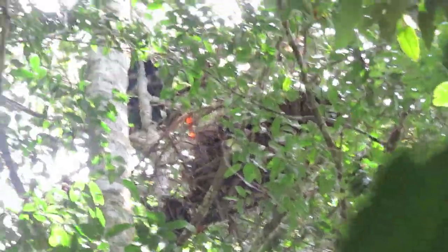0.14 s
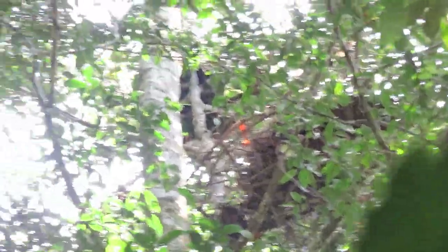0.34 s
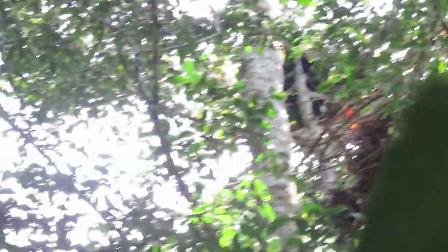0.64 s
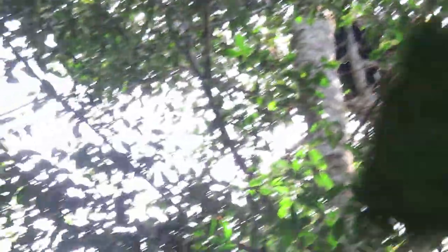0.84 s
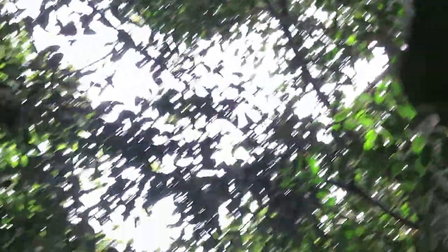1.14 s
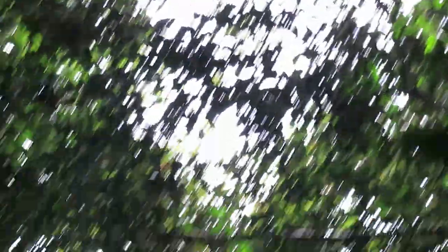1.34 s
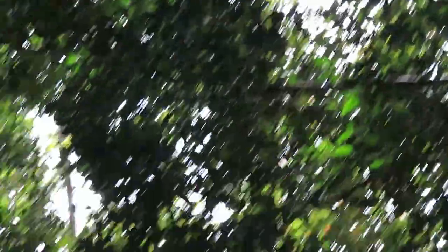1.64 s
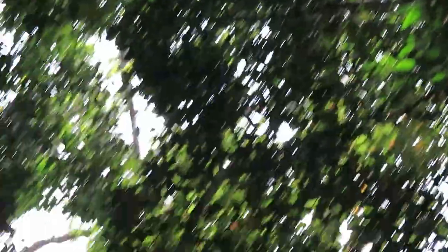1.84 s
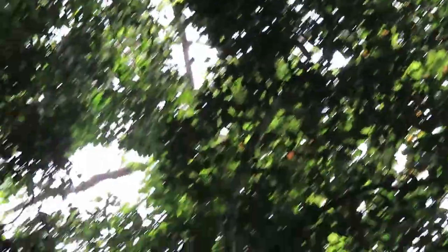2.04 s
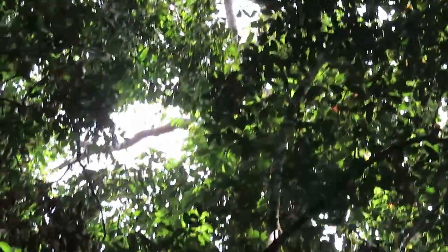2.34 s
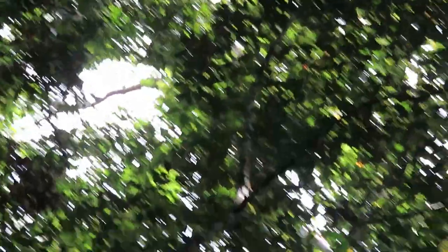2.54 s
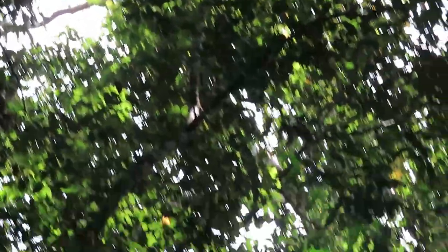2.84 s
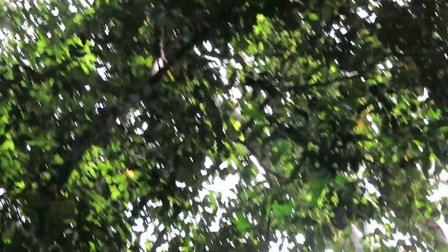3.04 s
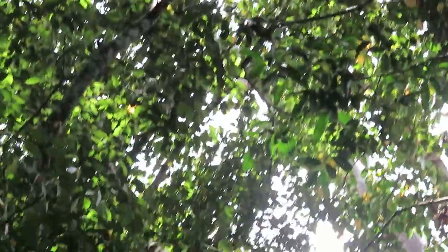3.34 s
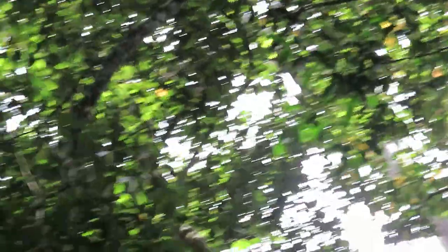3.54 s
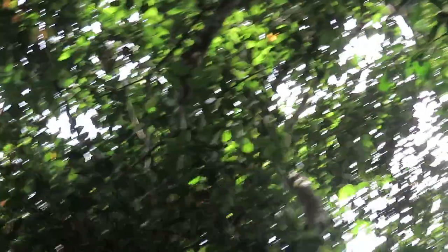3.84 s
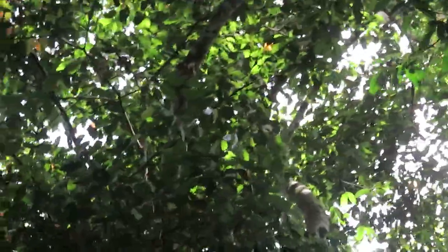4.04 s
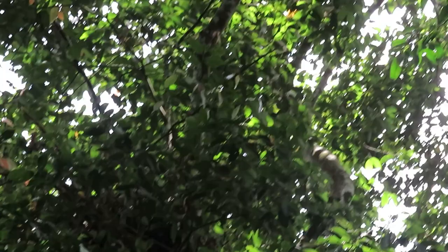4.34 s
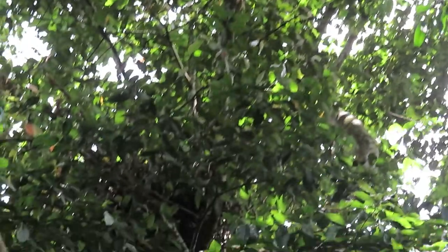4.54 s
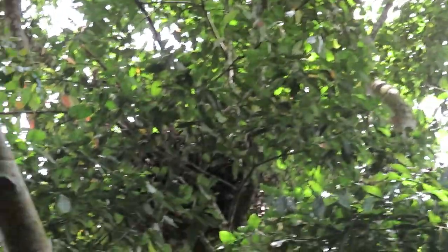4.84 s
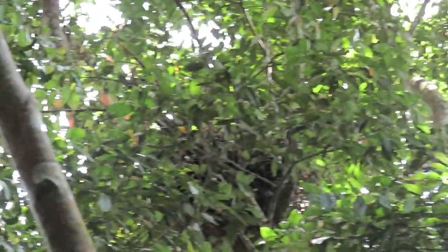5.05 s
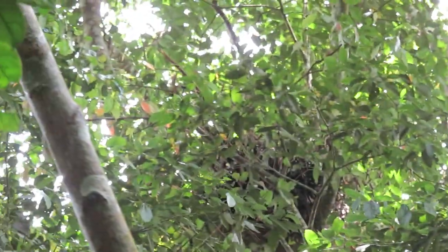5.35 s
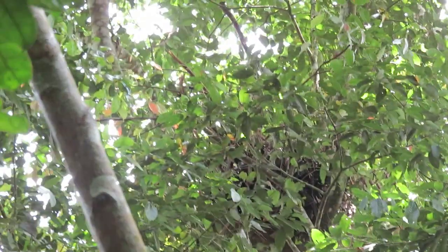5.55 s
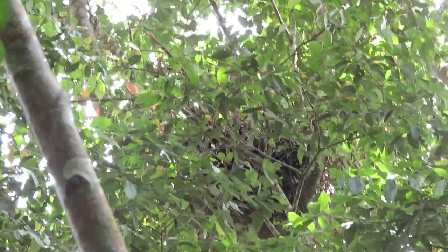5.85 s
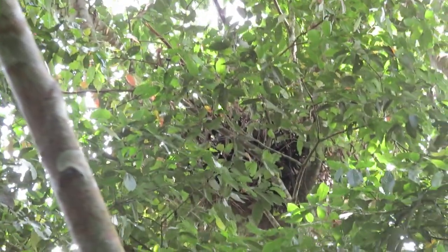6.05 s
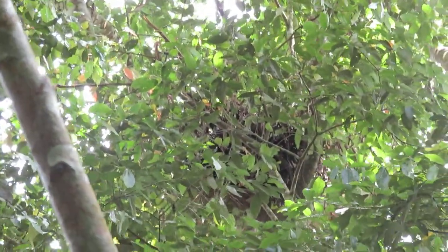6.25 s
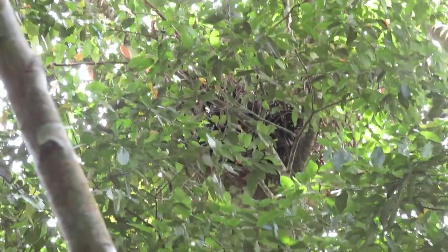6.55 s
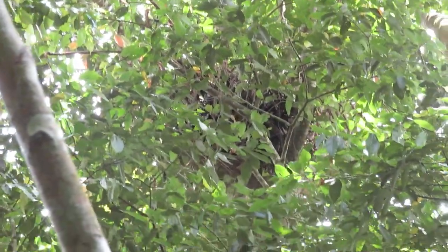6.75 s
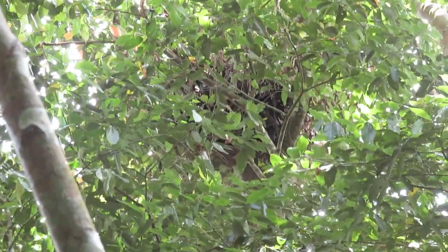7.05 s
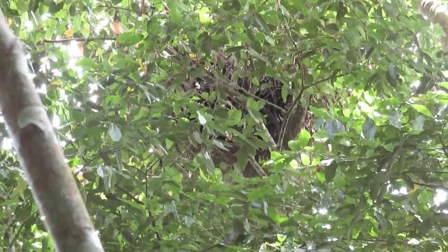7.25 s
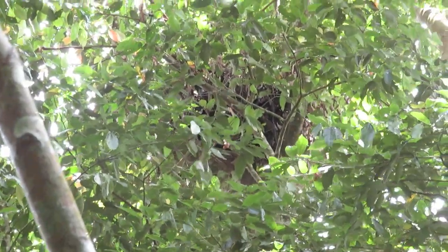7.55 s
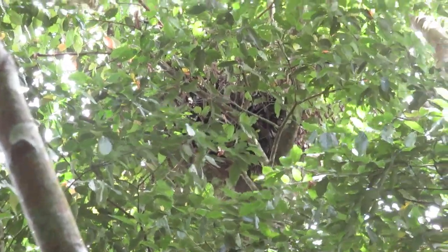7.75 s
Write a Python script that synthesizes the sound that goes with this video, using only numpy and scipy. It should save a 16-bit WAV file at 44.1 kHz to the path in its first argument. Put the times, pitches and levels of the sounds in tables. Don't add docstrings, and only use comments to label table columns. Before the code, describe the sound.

A soft, steady forest hush with very faint high insect singing runs throughout, heard from a handheld stereo camera. A dull knock lands at 0.1 s; from about 0.3 to 2.1 s nearby strained wood trembles in rapid, dry stick-slip creaks over low rubbing. Fibres snap sharply at 1.5 s and more lightly at 2 s, while a distant bird whistles upward near 1.8 s. Small wind puffs and dull housing thuds follow around 2.1 s, higher knocks at 2.7-3 s and another faint whistle at 3.1 s. The loudest crack, a tight cluster, bursts at 3.8 s. Birdcall returns at 4.6 s. From 5 to 6.2 s the rubbing swells into short hums with tiny ticks. A bright snap hits at 6.3 s, a faint whistle at 6.4 s, then creaks stutter from 6.5 to 7.4 s, with a snap near 7.25 s. From 7.7 s, low gusts bump the microphone, left first.

```python
import sys
import numpy as np
from scipy import signal
from scipy.io import wavfile
from scipy.ndimage import uniform_filter1d

SR = 44100
rng = np.random.default_rng(int(sys.argv[2]) if len(sys.argv) > 2 else 0)


def to_wav(sig):
    pcm = np.clip(np.atleast_2d(sig), -1, 1) * 32767
    pcm = np.round(pcm).astype(np.int16)
    wavfile.write(sys.argv[1], SR, pcm.T)


def attenuation_scalar(level_db):
    decades = np.asarray(level_db, float) / 20
    return 10 ** decades


N = 347949

# freq_hz, density_db_per_hz
HUSH_SPECTRUM = [(12, 7.5), (25, 6.5), (50, -2.5), (150, -6), (500, -2.5), (1200, -6.5), (1400, -9.5),
                 (3000, -20), (5500, -25.5), (6450, -19), (8200, -17), (10300, -26), (14000, -25.5),
                 (16500, -24)]
# freq_hz, correlation
HUSH_LIKENESS = [(60, 0.196), (180, 0.152), (550, 0.168), (1650, 0.11), (4970, 0.12), (15000, -0.042)]
# freq_hz, level_db
INSECT_BANDS = [(6460, -99), (6632, -77), (6998, -90.5), (7138, -77.5), (7671, -77.5), (8269, -101.5)]
# start_s, length_s, from_hz, to_hz, level_db
BIRD_GLIDES = [(0, .03, 4834, 4900, -73), (0, 0.034, 5360, 5600, -75), (1.8, 0.108, 4208, 4750, -73),
               (1.889, 0.094, 4713, 5520, -73), (3.031, 0.12, 4206, 4850, -74),
               (3.134, .07, 4820, 5580, -73), (4.628, 0.039, 4390, 5120, -71),
               (4.658, 0.091, 5072, 5310, -70), (4.738, .03, 5240, 3800, -72),
               (6.342, .045, 4080, 4050, -72), (6.379, 0.086, 4110, 4696, -72.5),
               (6.455, 0.088, 4706, 5550, -74.5)]
# peak_s, rise_s, fall_s, level_db, left_minus_right_db
WIND_PUFFS = [
    (1.975, .03, .04, -67, -6),
    (2.13, 0.068, .04, -62.5, -16),
    (2.236, 0.032, .015, -63, 6),
    (7.716, 0.021, 0.037, -52, 19),
    (7.755, 0.015, 0.021, -46, 0),
    (7.793, .015, .02, -45, 2),
    (7.825, .012, 0.017, -48, 4),
    (7.855, 0.015, 0.028, -46, 7),
]
# freq_hz, density_db_per_hz
WIND_SPECTRUM = [(8.8, -30), (15, -2), (32, 6), (86, -3.5), (230, -27), (400, -38), (650, -61.5),
                 (1100, -120)]
# start_s, peak_db, pitch_hz
HOUSING_KNOCKS = [
    (0.107, -35.5, 254),
    (2.061, -42, 260),
    (2.091, -39.5, 282.9),
    (2.119, -41, 281.5),
    (2.136, -40.5, 300),
    (2.677, -41.5, 477),
    (2.764, -42, 500),
    (2.96, -42, 489),
    (5.365, -46, 500),
    (5.45, -50.5, 330),
]
# time_s, pressure_db, low_lean_db
RUB_PRESSURE = [(0, -79, 13), (.35, -60, -4.5), (.9, -61.5, -14.5), (1.5, -57.5, 0.5), (1.75, -62, -10),
                (2.1, -64.5, 6), (2.3, -74, 3), (3.4, -79, -2), (3.7, -61, -7.5), (4.2, -71, 4),
                (4.95, -82, 8), (5.1, -64, -1.5), (6.15, -67, -3), (6.55, -60.5, -6), (6.74, -55, -5),
                (7.01, -57.5, -4), (7.36, -57, 4), (7.7, -72, 7.5)]
# peak_s, level_db, pitch_hz
DRAG_FLARES = [(1.3, -62, 570), (4.99, -64.5, 1155), (5.1, -69, 1120), (5.191, -60, 1140),
               (5.33, -63, 1134), (5.43, -60, 1165), (5.54, -60.5, 1154), (5.6, -57.5, 1140),
               (5.7, -63, 1150), (5.8, -61, 1140), (5.88, -56.5, 1165), (5.99, -62, 1137),
               (6.05, -69, 1150), (6.11, -63, 1150), (6.2, -58, 1155), (6.585, -59, 570), (6.635, -64, 580),
               (6.715, -52.5, 570), (6.76, -55.5, 570), (6.81, -52.5, 564), (6.845, -58, 560),
               (6.9, -58, 498), (7.43, -58, 549), (7.48, -58, 504), (.115, -63, 1490), (.125, -61, 450),
               (.165, -60, 480), (.215, -63, 470), (.24, -66, 600), (.54, -61, 834), (.61, -58, 1164),
               (.945, -58, 1200), (6.735, -56, 1260), (7.14, -60, 1350)]
# freq_hz, width_hz, level_db, right_lead_rad
BODY_LOW_MODES = [(384.5, 337, -18, 0.98), (570, 77, -19, -0.11), (833, 271, -3, 0.82)]
BODY_HIGH_MODES = [(1007, 81, -9, 0.15), (1220, 208, -3, 0.72), (1494, 390, -7.5, 0.715),
                   (1817, 243, -11.5, 0.74), (2867, 1900, -22, 2.1)]
# start_s, forward_db, back_db, slip_rate_hz
LOAD_TREMORS = [(.451, -49.5, -51, 435), (.522, -60, -66, 169.7), (.783, -54, -49, 294),
                (.854, -49, -46, 292), (.984, -47.5, -49.5, 290), (1.048, -53.5, -50.5, 270),
                (1.181, -54.5, -52, 322), (1.254, -50.5, -48, 286), (1.384, -49.5, -47.5, 276),
                (1.452, -55, -47.5, 272), (1.583, -51.5, -49, 290), (1.714, -52, -50.5, 263),
                (1.779, -60.5, -73, 252), (1.85, -66, -61, 310), (2.115, -58, -57, 308.6),
                (6.179, -62, -55.5, 311.7), (6.497, -71, -54.5, 253), (6.557, -52, -49, 295),
                  (6.62, -55.5, -50, 287), (6.692, -52, -47.5, 305.1), (6.754, -50, -54, 269),
                  (6.826, -56, -53, 289), (6.889, -49.5, -62.5, 270), (6.947, -50, -68, 210.5),
                  (7.024, -77, -65, 400), (7.087, -60, -47.5, 305.7), (7.157, -51, -45, 294),
                  (7.221, -44.5, -40, 304.6), (7.288, -45, -47.5, 364.4), (7.354, -61, -65.5, 349.3)]
# start_s, length_s,
# level_db, slip_rate_hz, low_minus_high_db
LONE_CREAKS = [(0.107, 0.0098, -55, 227.26, -8), (0.282, .0074, -57, 340, 2.5),
               (0.321, .0077, -49.5, 440, 2), (.583, 0.028, -54, 333, -1), (0.652, .0336, -49.5, 274, 1),
               (0.721, 0.0322, -47.5, 260, -1.5), (0.915, 0.0321, -52, 385, -1),
               (1.121, 0.026, -52.5, 304, -5.5), (1.321, 0.0238, -50.5, 270, -5),
               (1.658, 0.024, -46.5, 275, -2.5), (1.932, 0.0046, -52, 340, 3),
               (2.011, 0.0041, -50.5, 373, 1.5), (3.73, 0.00752, -55, 318, -1),
               (5.358, .0214, -57, 490, -7.5), (5.451, 0.0097, -55, 310, 1),
               (6.231, 0.0081, -44.5, 272.7, -6), (6.465, 0.015, -50.5, 275, -13),
               (6.792, 0.0315, -51.5, 270, -5), (7.066, .0064, -49.5, 269, -11),
               (7.131, .0166, -55, 290, -6.5), (7.425, 0.0886, -48.5, 270, -6)]
# start_s, peak_db, pitch_hz
SPLINTER_PINGS = [(1.5045, -41, 2950), (1.53, -38, 2950), (1.98, -37, 2950), (3.785, -36, 2900),
                  (3.7927, -33, 2950), (1.534, -40, 2750), (3.7955, -36, 2450), (6.2718, -33.5, 2950),
                  (6.278, -39, 2700), (6.5577, -54.5, 2300), (6.7234, -56, 2400), (6.9273, -48, 3200),
                  (6.9523, -54, 2500), (7.0725, -54, 2300), (7.09, -50, 2400), (7.1124, -51, 2400),
                  (7.1588, -47, 2800), (7.1865, -53, 3200), (7.2265, -49, 2700), (7.2453, -28, 2950),
                  (7.2955, -49, 2800), (7.3195, -53, 3100), (1.5308, -29, 1830), (3.791, -26, 1840),
                  (3.7945, -27, 1830), (3.7935, -41, 4000), (3.793, -43, 4900), (3.7932, -42, 5630),
                  (5.229, -52, 3300), (6.2775, -42, 5650), (6.2785, -44, 3790), (6.278, -49, 8300),
                  (6.2745, -31, 1210), (7.2458, -33, 2300), (7.246, -43, 4000), (6.929, -46, 2100)]
# freq_hz, left_db, right_db, t60_s, right_lead_rad
WOOD_MODES = [(640, -25, -26.5, 0.025, -0.5), (843, -31.5, -30, 0.02, -2), (1015, -10.5, -6, 0.015, 3.5),
              (1230, -17, -23, 0.029, -0.7), (1484, 2.5, 1.5, 0.024, 1.2), (1827, -3.5, -12.5, 0.0244, 2.5),
              (2057, -11.5, -13.5, 0.022, 3), (2450, -18, -8.5, 0.0093, 6),
              (2950, -10, -15.5, 0.01345, -0.4), (3454, -20, -26, 0.013, 3), (3870, -33, -31, 0.013, 5.5),
              (4900, -23.5, -33, 0.01, 5), (5630, -29.5, -26, 0.0128, 1.8)]
# start_s, peak_db, pitch_factor, brightness_db_per_octave, rise_ms
SNAP_FIBRES = [(1.5046, -22, 1.012, -3.5, 0.483), (1.5203, -31, 0.796, 2, 1.1), (1.528, -29, 0.84, 4, 1.4),
               (1.5306, -17.5, 1.038, -3, 0.716), (1.535, -27, 1.03, -1, 0.53),
               (1.98, -32.5, 0.963, -2, 0.3), (1.9996, -32.5, 1.01, -6, 0.46),
               (3.785, -25.5, 1.12, 3.5, 0.46), (3.7871, -26.5, 0.64, 0, 0.49),
               (3.7901, -12, 1.001, -0.5, 1.0), (3.7929, -11, 1.002, -2.5, 0.58),
               (3.7951, -12.5, 1.003, -1.5, 0.374), (3.8, -22, 0.97, -5, 0.72),
               (6.2502, -34, 0.83, -2, 1.14), (6.2673, -32, 0.86, -8, 0.82), (6.2744, -16, 1.02, 2, 1.3),
               (6.2777, -15.5, 1.03, 3.5, 0.71), (6.285, -33.5, 0.92, -11, 0.79),
               (7.24, -32, 0.96, -2.5, 1.3), (7.245, -21, 1.085, -1, 0.3), (7.2466, -24.5, 0.83, 3.5, 0.29),
               (7.2489, -27, 0.976, 2.5, 1.2), (7.2534, -29.5, 1.01, -6, 1.2), (7.2627, -37, .92, -8, 1.2)]
# start_s, peak_db, pitch_factor, brightness_db_per_octave
TICK_FIBRES = [(1.548, -41, 0.9, -7), (1.9794, -29, 0.66, -1), (2.2224, -43, 0.83, -7),
               (2.2274, -42, 0.913, -14), (3.7617, -40, 0.9395, 0), (3.7789, -40.5, 0.99, -2.5),
               (5.211, -41.5, 0.894, -3), (5.2287, -35.5, 0.76, 2), (5.232, -40, 0.97, -6),
               (6.2705, -31, 1, 3), (6.7232, -35, .89, -7), (6.7325, -40, 0.96, -10),
               (6.926, -39, 0.641, 7), (6.9283, -35.5, 0.77, 1), (6.931, -38, 1, -4),
               (7.158, -39, 0.98, 0.5), (7.163, -38, 0.58, 2.5), (7.2259, -39.5, 1, 0.5),
               (7.229, -35, 0.85, -6), (2.049, -53, 0.89, -2), (2.082, -51, 0.887, -2), (2.12, -47, .9, 0),
               (2.135, -50, 1, 6), (2.148, -50, 0.93, -4), (6.557, -47.5, 1, 0), (6.5836, -45, 1, 0),
               (6.7543, -43, 0.93, -2), (6.8929, -46, 0.73, 0), (6.952, -44, 0.92, 0),
               (7.052, -50.5, 0.76, -4), (7.0725, -48.5, 0.91, 0), (7.09, -40.5, 0.92, 1),
               (7.1843, -43, 0.92, 0), (7.2935, -40, 0.92, 2), (7.3185, -46, 0.82, 2),
               (0.8802, -41, 0.78, -3), (1.116, -45, .85, -3), (6.696, -44, .87, -5),
               (7.1165, -41, 0.88, -2), (7.189, -44, 1, 2), (.3275, -48, 0.65, -3), (.595, -42, 0.72, -3)]


def evened(x):
    return x / np.sqrt(np.mean(x ** 2) + 1e-20)


def read(points, hz):
    f, value = np.transpose(points)
    return np.interp(np.log(hz + 1), np.log(f + 1), value)


def add(mix, start_s, sound):
    part = mix[:, round(start_s * SR):][:, :sound.shape[-1]]
    part += sound[..., :part.shape[1]]


def sides(left_minus_right_db):
    return attenuation_scalar(np.array([[left_minus_right_db / 2], [-left_minus_right_db / 2]]))


def lowpass(x, hz, order):
    return signal.sosfilt(signal.butter(order, hz, fs=SR, output="sos"), x)


def resonate(x, hz, width_hz, lead_rad=0.):
    turn = np.exp(2j * np.pi * np.cumsum(hz * np.ones(x.shape[-1])) / SR)
    r = np.exp(-np.pi * width_hz / SR)
    z = turn * signal.lfilter([1 - r], [1, -r], x / turn)
    return 2 * (z * np.exp(1j * np.array([[0], [lead_rad]]))).real


def resonate_twice(x, hz, width_hz, lead_rad):
    return resonate(resonate(x, hz, width_hz)[0], hz, width_hz, lead_rad)


def coloured(spectrum, likeness, patch_db):
    frames, hz = N // 1024 + 5, np.fft.rfftfreq(4096, 1 / SR)
    a, b, c, d, patches = rng.standard_normal((frames, 2049, 5)).T
    patches = uniform_filter1d(patches, size=40, axis=0)
    patches = evened(uniform_filter1d(patches, size=3, axis=1))
    same = np.clip(read(likeness, hz), -1, 1)[:, None]
    left = a + 1j * b
    right = same * left + np.sqrt(1 - same ** 2) * (c + 1j * d)
    z = np.array([left, right]) * attenuation_scalar(read(spectrum, hz)[:, None] + patch_db * patches)
    return evened(signal.istft(z, nperseg=4096, noverlap=3072)[1][:, :N])


def hush():
    return attenuation_scalar(-57) * coloured(HUSH_SPECTRUM, HUSH_LIKENESS, patch_db=1.26)


def insects():
    out = np.zeros((2, N))
    for hz, level_db in INSECT_BANDS:
        out += attenuation_scalar(level_db) * evened(resonate(rng.standard_normal((2, N)), hz, width_hz=45))
    return out


def bird():
    bend, fade_db = 0.16, 1.5
    direct_db, echo_db, echo_t60_s = -6.5, 1, 0.55
    dry = np.zeros((2, N))
    for start_s, length_s, from_hz, to_hz, level_db in BIRD_GLIDES:
        u = np.linspace(0, 1, round(length_s * SR))
        hz = from_hz + (to_hz - from_hz) * (u - bend * np.sin(2 * np.pi * u) / (2 * np.pi))
        waver = evened(lowpass(rng.standard_normal(SR // 2), 94, order=2))[:len(u)]
        whistle = np.sin(2 * np.pi * np.cumsum(hz + 28 * waver) / SR)
        tone = np.sqrt(2) * (1 + 0.2 * waver) * whistle
        add(dry, start_s, attenuation_scalar(level_db + fade_db * u) * tone * signal.windows.tukey(len(u), 0.2))
    t = np.arange(SR // 2) / SR
    sparse = rng.random((2, len(t))) < 0.03
    echoes = rng.standard_normal((2, len(t))) * sparse * attenuation_scalar(-60 * t / echo_t60_s)
    echoes /= np.linalg.norm(echoes[0])
    return attenuation_scalar(direct_db) * dry + attenuation_scalar(echo_db) * signal.fftconvolve(dry, echoes, axes=1)[:, :N]


def wind():
    flutter_db, flutter_hz = 2, 40
    air = coloured(WIND_SPECTRUM, [(20, 0.32), (500, 0.22)], patch_db=1.5)
    lumps = evened(lowpass(rng.standard_normal((2, N)), flutter_hz, order=2))
    air = evened(air * attenuation_scalar(flutter_db * lumps))
    out, t = np.zeros((2, N)), np.arange(N) / SR
    for peak_s, rise_s, fall_s, level_db, pan_db in WIND_PUFFS:
        puff = np.exp(-((t - peak_s) / np.where(t < peak_s, rise_s, fall_s)) ** 2)
        out += attenuation_scalar(level_db) * sides(pan_db) * puff * air
    return out


def knocks():
    out, t = np.zeros((2, N)), np.arange(2000) / SR
    for start_s, peak_db, hz in HOUSING_KNOCKS:
        rise = 1 - np.exp(-t / 0.000483)
        thud = -np.sin(2 * np.pi * hz * t) * attenuation_scalar(peak_db - 60 * t * hz / 3.4)
        add(out, start_s, sides(-16) * thud * rise)
    return out


def rubbing():
    time_s, high_db, lean_db = np.transpose(RUB_PRESSURE)
    hums = [(high_db, 1160, 204, -8.5),  # pressure_db, freq_hz, width_hz, level_db
            (high_db + lean_db, 546, 185, -6),
            (high_db, 1020, 1020, -5.5)]
    t, out = np.arange(N) / SR, np.zeros((2, N))
    for pressure_db, hz, width_hz, level_db in hums:
        size = attenuation_scalar(3.2 * np.minimum(rng.exponential(1, N), 3))
        slipping = rng.random(N) < 500 / SR
        grit = size * slipping * rng.choice([-1, 1], N)
        hum = evened(resonate_twice(grit, hz, width_hz, 0.83))
        out += attenuation_scalar(np.interp(t, time_s, pressure_db) + level_db) * hum
    return out


def flares():
    swell_s, width_hz = 0.0207, 75
    out, t = np.zeros((2, N)), np.arange(-0.1, 0.1, 1 / SR)
    swell = np.exp(-(t / swell_s) ** 2)
    for peak_s, level_db, hz in DRAG_FLARES:
        hum = resonate_twice(rng.standard_normal(len(t)), hz, width_hz, 0.654)
        add(out, peak_s + t[0], attenuation_scalar(level_db) * evened(hum * swell) * np.sqrt(np.mean(swell ** 2)))
    return out


def bursts():
    back_after_s, forward_s, back_s = 0.025, 0.013, 0.0094
    forward_low_db, back_low_db = 1, -4
    rows = list(LONE_CREAKS)
    for start_s, forward_db, back_db, rate_hz in LOAD_TREMORS:
        rows.append((start_s, forward_s, forward_db, rate_hz, forward_low_db))
        rows.append((start_s + back_after_s, back_s, back_db, rate_hz, back_low_db))
    return rows


def ring_body(slips, modes):
    lag_s_per_khz = 0.0012016
    out = np.zeros((2, N))
    for hz, width_hz, level_db, lead_rad in modes:
        late = np.roll(slips, round(lag_s_per_khz * SR * hz / 1000))
        out += attenuation_scalar(level_db) * resonate_twice(late, hz, width_hz, lead_rad) / np.sqrt(width_hz / 2)
    return out


def creaks():
    creak_db, pan_db, jitter = 0.5, -4, 0.048
    spread_db = 2
    drive = np.zeros((2, N))
    for start_s, length_s, level_db, rate_hz, low_db in bursts():
        late, size = rng.standard_normal((2, 40))
        at_s = np.cumsum(1 + jitter * np.clip(late, -3, 3)) / rate_hz - 0.004
        outside_s = np.maximum(abs(at_s - length_s / 2) - length_s / 2 + 0.0064, 0)
        swell = np.exp(-(outside_s / 0.00731) ** 2)
        slips = attenuation_scalar(level_db + 2.25 * size) * swell / np.sqrt(rate_hz)
        balance = attenuation_scalar([[low_db + spread_db * late[-1]], [0]])
        index = np.round((start_s + at_s) * SR).astype(int)
        np.add.at(drive, (slice(None), index), balance * slips)
    body = ring_body(drive[0], BODY_LOW_MODES) + ring_body(drive[1], BODY_HIGH_MODES)
    return attenuation_scalar(creak_db) * SR / np.sqrt(2 * np.pi) * sides(pan_db) * body


def pings():
    fade_cycles, rise_s, right_lead_rad = 42, 0.0006, 1.6
    out, t = np.zeros((2, N)), np.arange(900) / SR
    for start_s, peak_db, hz in SPLINTER_PINGS:
        ring = np.sin(2 * np.pi * hz * t + np.array([[0], [right_lead_rad]]))
        fade = attenuation_scalar(peak_db - 60 * t * hz / fade_cycles)
        add(out, start_s, fade * (1 - np.exp(-t / rise_s)) * ring)
    return out


def snaps():
    snap_pan_db, tick_pan_db, tick_rise_ms = -1.5, -5, 0.83
    crack_db, crack_t60_s, crack_hz = -21, 0.016, 8893
    shove_db, shove_s = -14, 0.0013
    fizz_db, fizz_rise_s, fizz_fall_s = -49, 0.02, 0.014
    left_ringing = 0.2
    breaks = [(*row, snap_pan_db) for row in SNAP_FIBRES]
    breaks += [(*row, tick_rise_ms, tick_pan_db) for row in TICK_FIBRES]
    breaks.sort()
    gaps_s = np.diff([row[0] for row in breaks], append=np.inf)

    out, t = np.zeros((2, N)), np.arange(2600) / SR
    hz, left_db, right_db, t60_s, lead_rad = np.transpose(WOOD_MODES)[:, :, None]
    u = t / shove_s
    shove = attenuation_scalar(shove_db) * np.outer([-0.4, 1], u * (1 - u / 2) * np.exp(1 - u))
    fizz = np.exp(-((t - 0.03) / np.where(t < 0.03, fizz_rise_s, fizz_fall_s)) ** 2)
    for (start_s, peak_db, pitch, bright_db, rise_ms, pan_db), gap_s in zip(breaks, gaps_s):
        own = rng.standard_normal((len(WOOD_MODES), 1))
        tear = lowpass(rng.standard_normal((2, len(t))), crack_hz, order=1)
        level_db = bright_db * np.log2(hz / 1480) + 1.65 * own - 60 * t / t60_s
        turn = 2 * np.pi * hz * pitch * t
        left = (attenuation_scalar(left_db + level_db) * np.sin(turn)).sum(0)
        right = (attenuation_scalar(right_db + level_db) * np.sin(turn + lead_rad)).sum(0)
        ring = np.array([left, right])
        crack = attenuation_scalar(crack_db + 0.92 * bright_db - 60 * t / crack_t60_s) * tear
        damped = left_ringing + (1 - left_ringing) * np.exp(-np.maximum(t - gap_s, 0) / 0.0004)
        rise = np.sin(np.pi / 2 * np.clip(t * 1000 / max(rise_ms, 0.05), 0, 1)) ** 2
        add(out, start_s - 0.03, attenuation_scalar(peak_db + fizz_db) * tear[:, ::-1] * fizz)
        add(out, start_s, attenuation_scalar(peak_db - 1.5) * sides(pan_db) * damped * rise * (ring + crack + shove))
    return out


def scene():
    background = hush() + insects() + bird() + wind() + knocks()
    return background + rubbing() + flares() + creaks() + pings() + snaps()


def band_limit(x):
    return signal.sosfilt(signal.butter(12, 16410, fs=SR, output="sos"), x)


def record(dry):
    edge = signal.firwin(511, 15760, window=("kaiser", 6), fs=SR)
    mix = signal.oaconvolve(dry, edge[None], "same")
    return band_limit(mix)


dry = scene()
out = record(dry)
to_wav(out)
```